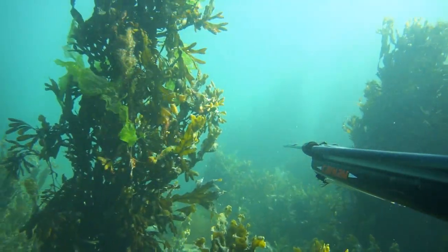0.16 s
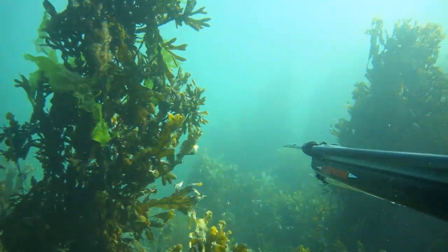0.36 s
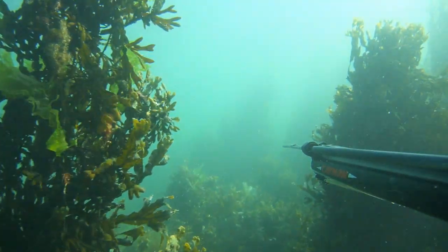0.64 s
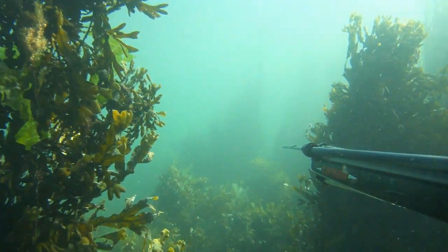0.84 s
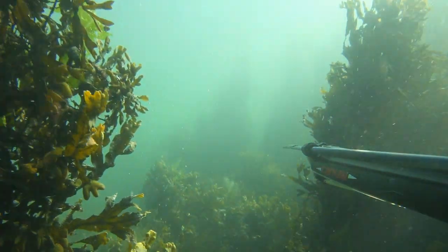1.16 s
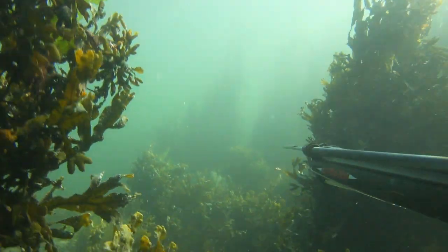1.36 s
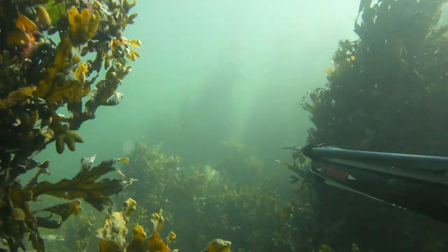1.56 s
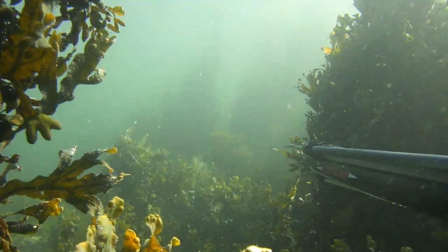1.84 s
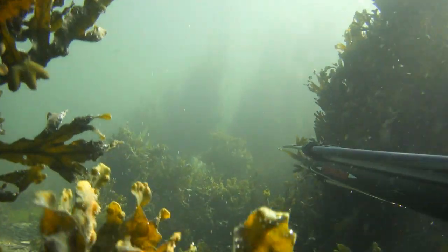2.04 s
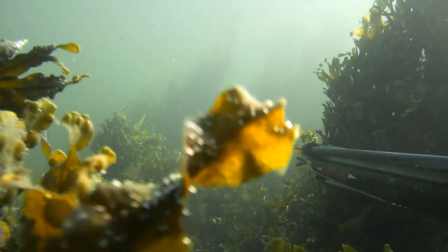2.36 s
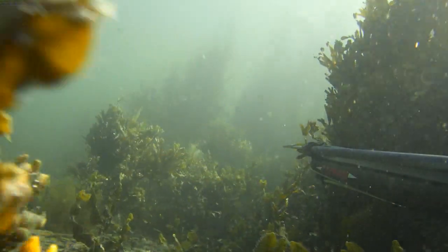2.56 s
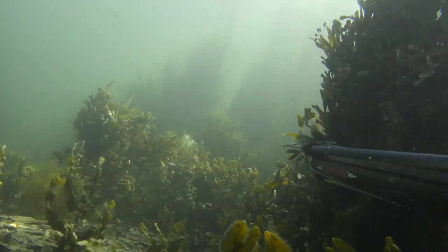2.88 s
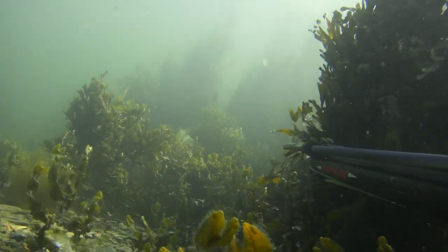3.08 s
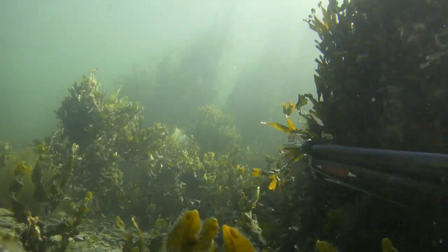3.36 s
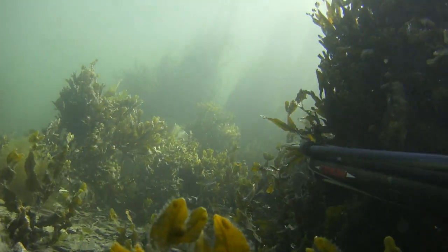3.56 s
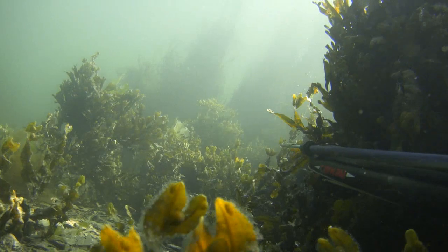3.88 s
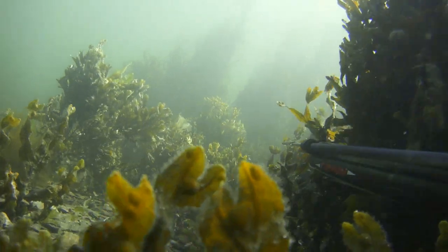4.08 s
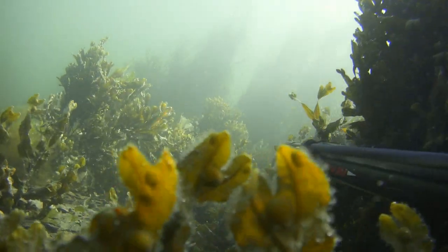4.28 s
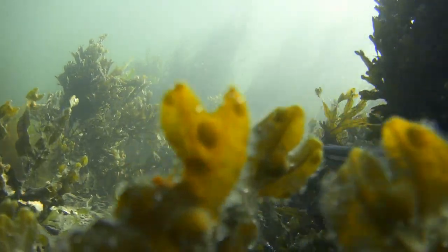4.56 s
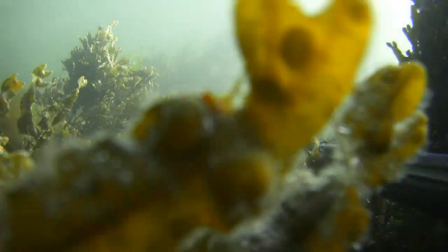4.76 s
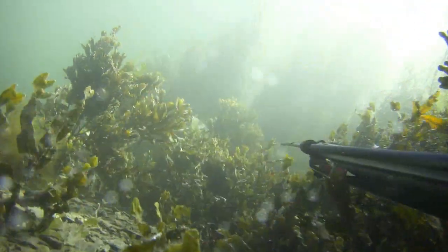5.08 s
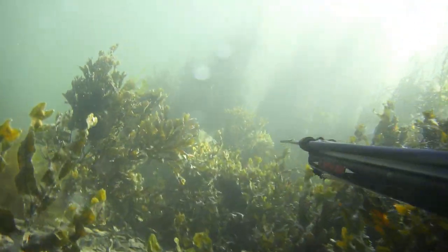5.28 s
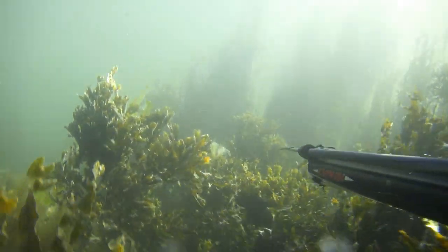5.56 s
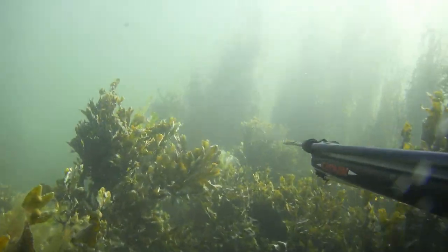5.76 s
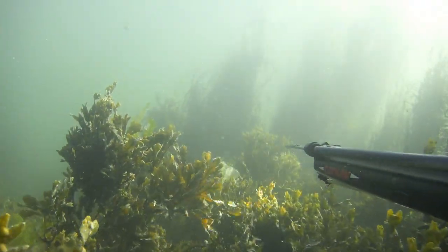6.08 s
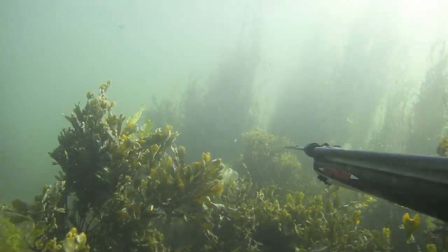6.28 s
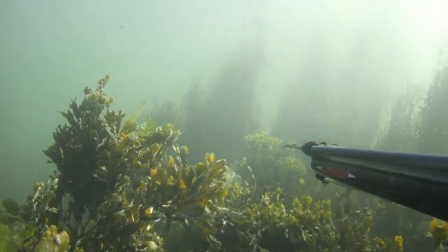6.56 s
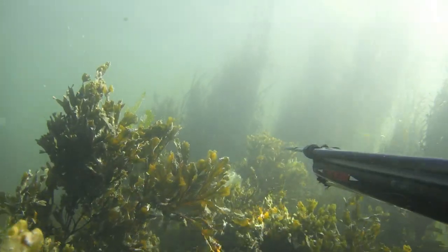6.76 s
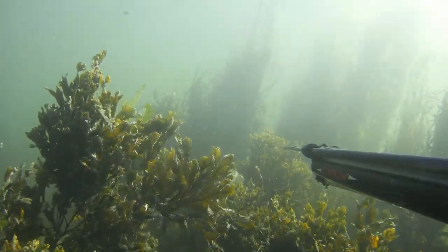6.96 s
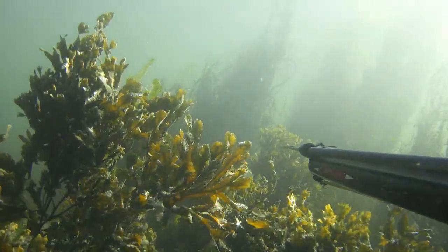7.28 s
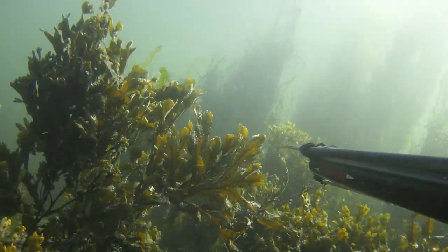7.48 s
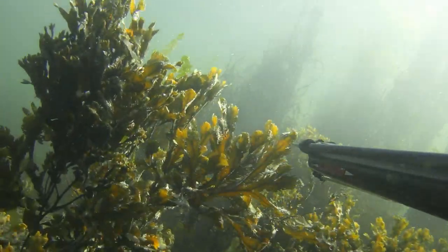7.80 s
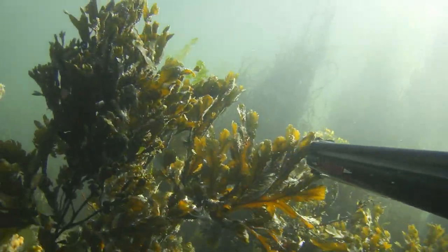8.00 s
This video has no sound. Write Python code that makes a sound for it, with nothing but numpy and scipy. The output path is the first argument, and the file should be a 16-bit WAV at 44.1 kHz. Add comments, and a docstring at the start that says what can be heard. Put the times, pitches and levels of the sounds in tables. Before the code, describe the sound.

Close, boxy mono underwater sound. Water murmurs and rustles against a sealed case, with a thin high whine and a metallic buzzing of quick motor ticks, silent briefly early on. Bright snaps come several times a second in clusters, with gaps. Fronds brush and tap; one hard knock comes near two and a half seconds, then a short flurry of bumps and rough scraping around five, before it settles to buzz and clicks.

```python
"""Water thrums and rustles in a watertight camera housing from the start, over faint hiss and a thin high
whine. A focus motor ticks about 120 times a second and rests once; enclosed air gulps and the iris snaps.
Fronds of seaweed brush the wall, knock on it, and later one scrapes along in short strokes. Flow, brushing and
scraping are shaped noise; knocks and motor steps are damped rings; snaps and ticks are bursts of rattle through
resonances; gulps and whine are tones."""
import sys
import numpy as np
from scipy import signal
from scipy.fft import rfft, irfft, next_fast_len
from scipy.io import wavfile
from scipy.ndimage import uniform_filter1d, map_coordinates

SR = 44100
rng = np.random.default_rng(int(sys.argv[2]) if len(sys.argv) > 2 else 0)


def output_pcm(signal):
    """Save a mono or channel-first signal as 16-bit PCM at the path in sys.argv[1].

    Samples are clipped to [-1, 1] before scaling.
    """
    pcm = np.clip(np.atleast_2d(signal).T, -1, 1) * 32767
    wavfile.write(sys.argv[1], SR, np.round(pcm).astype(np.int16))


N = 358533

# water flowing past the housing: time_s, thrum_db, rumble_db
WATER_FLOW = [(0, -46, -58), (.2, -38.5, -48.5), (.34, -50.5, -56), (.62, -47.5, -49), (.72, -41, -46),
              (.97, -39, -48), (1.2, -46.5, -59), (1.56, -57, -62), (2.22, -48.5, -71), (2.3, -44.5, -48),
              (2.56, -37, -47), (2.87, -40.5, -51.5), (3.3, -38.5, -48.5), (3.7, -40, -59),
              (3.9, -43, -54.5), (4.6, -43, -53), (4.76, -33, -43), (5.35, -43, -45), (5.9, -46.5, -47.5),
              (6.15, -45.5, -57), (7.93, -50, -64), (8.13, -62, -57)]
# resonances of the housing wall: centre_hz, width_hz, relative_db
WALL_MODES = [(1246, 330, 5.5), (1815, 141, 4.5), (2140, 130, -4), (2840, 306, -2), (4400, 860, -1)]
# resonances of the air in the housing: centre_hz, width_hz, relative_db
AIR_MODES = [(320, 250, -0.5), (527, 193, 9.5)]
# resonances of the housing as a whole: centre_hz, width_hz, relative_db
HOUSING_MODES = [(103, 63, 0), (212.4, 134, 27)]
# spectrum of the steady noise: frequency_hz, relative_db (per Hz)
HISS_SPECTRUM = [(20, -12), (270, -12.5), (400, -22.5), (830, -0.5), (1320, -15), (2840, -10.5),
                 (4300, -12.5), (5600, -15.5), (7160, -9.5), (8300, -18), (10800, -23), (11600, -28),
                 (12700, -25), (13500, -74)]
# focus motor, one row per step of its cycle: high_ring_before_turn_db, high_ring_after_turn_db,
# low_ring_db, body_db, tick_before_turn_db, tick_after_turn_db
MOTOR_STEPS = [(-38.5, -36, -40.5, -36.5, -46, -57), (-40, -35.5, -52, -45, -56, -48),
               (-43, -34, -48, -36.5, -47, -44), (-26, -50, -43, -78, -42, -48),
               (-39.5, -37.5, -31.5, -34.5, -44.5, -43.5), (-39, -51, -68, -51, -53, -50),
               (-34, -46, -55, -33.5, -44, -46.5), (-38, -33, -65, -66, -45, -45)]
# rings of the lens barrel (high free, high held, low, body): pitch_hz, t60_s
BARREL_RINGS = [(4770, 0.07), (4700, .009), (3640, 0.011), (1720, 0.018)]
# resonances in the tick of a step: centre_hz, width_hz, level_db
TICK_MODES = [(3830, 480, -6.5), (4390, 460, 1), (5330, 550, 1), (6740, 790, -6.5), (7960, 710, -10.5),
              (9840, 1450, -17)]
# squeezes of the enclosed air: centre_s, level_db, pitch_hz
AIR_GULPS = [(0.142, -28.5, 490), (0.191, -27.5, 517), (0.701, -21.5, 523), (0.853, -23.5, 470),
             (1.035, -25, 463), (1.358, -30.5, 494), (2.319, -28, 533), (2.36, -29, 518), (2.55, -27, 517),
             (2.571, -29, 521), (2.635, -27, 497), (2.667, -27, 500), (3.022, -33, 513), (3.351, -22, 496),
             (3.412, -27, 503), (3.437, -23, 510), (3.464, -28, 492), (3.488, -21, 513), (3.62, -26, 484),
             (3.631, -24.5, 507), (4.687, -25.5, 442), (5.558, -34, 235), (5.776, -36, 219),
             (5.801, -28.5, 490), (5.853, -36.5, 240), (5.979, -36, 250), (7.972, -33.5, 456),
             (8.071, -28.5, 507)]
# iris snaps: time_s, level_db
IRIS_SNAPS = [(0.169, -12), (0.2354, -11), (0.304, -11.5), (0.436, -10), (.603, -11.5), (0.702, -12.5),
              (0.837, -13.5), (1.004, -13), (1.103, -14.5), (1.238, -13.5), (1.279, -28), (1.304, -22),
              (1.404, -13.5), (1.7377, -13.5), (2.206, -13.5), (2.8397, -18.5), (3.005, -15), (3.106, -16),
              (3.164, -21), (3.2407, -21), (3.374, -18), (3.5075, -16.5), (3.6075, -20.5), (3.6737, -17.5),
              (3.7749, -17.5), (3.8417, -15.5), (3.908, -11.5), (3.9751, -17.5), (4.042, -15),
              (4.135, -14.5), (4.14, -13.5), (4.1474, -11), (5.473, -15), (5.478, -10), (5.486, -21),
              (5.509, -13.5), (5.543, -14), (5.575, -12), (5.609, -12), (5.6758, -12.5), (5.776, -10.5),
              (5.9097, -16), (6.0094, -13.5), (6.11, -14.5), (6.177, -14.5), (6.2769, -12), (6.4108, -13),
              (6.578, -16.5), (6.744, -14), (6.945, -14), (7.8126, -16.5), (7.979, -19)]
# resonances of the iris blades: centre_hz, width_hz, relative_db
BLADE_MODES = [(1690, 530, 0.5), (2560, 1400, -4.5), (3630, 430, 1.5), (4540, 480, 4), (6150, 2000, 3),
               (7440, 950, 5), (8920, 550, -0.5), (10810, 590, -5.5), (12000, 550, -19)]
# fronds brushing the wall: start_s, length_s, rustle_db, thrum_db
FROND_BRUSHES = [(.37, 0.039, -44, -48), (.69, 0.028, -33.5, -35), (.82, 0.11, -41, -55),
                 (.91, 0.047, -38.5, -44), (1.31, 0.017, -34, -44), (1.39, 0.083, -42, -48),
                 (1.59, 0.053, -35.5, -45.5), (1.7, 0.032, -37.5, -44.5), (2.475, 0.083, -55, -39.5),
                 (2.66, 0.022, -38.5, -41), (3.0, 0.13, -41.5, -40), (3.3, 0.062, -39, -51),
                 (3.37, 0.06, -47, -35), (3.635, 0.04, -61, -35.5), (3.73, 0.055, -39.5, -58),
                 (4.68, 0.033, -37.5, -44), (4.74, 0.043, -37.5, -51), (5.44, 0.11, -37.5, -41),
                 (5.66, 0.026, -33.5, -50), (6.23, 0.023, -40, -61), (6.295, 0.0086, -33, -53),
                 (6.475, 0.026, -40, -53), (6.535, 0.048, -37.5, -48), (6.785, 0.012, -39, -45),
                 (6.855, 0.026, -39, -48), (7.365, 0.031, -38.5, -54), (7.49, 0.03, -36.5, -51),
                 (7.845, 0.0069, -40, -49), (8.06, 0.043, -40.5, -45)]
# fronds and bubbles knocking on the housing: start_s, blow_db, ring_db, ring_hz
HOUSING_KNOCKS = [(0.6623, -19, -18, 1140), (.701, -27, -13, 1270), (.708, -22, -18, 540),
                  (0.793, -20, -11.5, 1320), (0.9195, -16, -14, 1210), (0.956, -26, -16.5, 1300),
                  (1.492, -25, -18, 1310), (2.4549, -7.5, -17, 1033), (2.4599, -8.5, -15.5, 312),
                  (2.4632, -22, -15, 500), (3.507, -17, -18, 1760), (3.7676, -18, -15.5, 650),
                  (4.678, -16, -16, 1920), (4.7922, -2, -18, 560), (4.7965, -20, -10.5, 610),
                  (4.812, -15, -18, 610), (4.851, -19, -16, 570), (4.926, -18, -24, 510),
                  (4.949, -11, -17, 437), (5.001, -12, -9, 423), (5.0687, -2, -12, 594),
                  (5.104, -26, -12, 700), (5.124, -5, -20, 1900), (5.214, -14, -26, 430),
                  (5.222, -22, -10, 534), (5.236, -20, -11, 493), (5.255, -13, -11, 1900),
                  (5.286, -19, -24, 477), (5.298, -13, -19, 1820), (5.3523, -7, -13, 830),
                  (5.355, -24, -9, 2100), (5.367, -13.5, -5, 2980), (5.3778, -34, 0, 1960),
                  (5.401, -24, -10, 1710), (5.409, -22, -14, 2030), (5.677, -12, -18, 1290),
                  (5.684, -9, -25, 235), (8.089, -31, -24, 1280)]
# a frond dragged over the port: start_s, length_s, scrape_db, thrum_db, rumble_db
FROND_STROKES = [(4.84, 0.091, -30.5, -32, -40.5), (4.97, 0.018, -30.5, -28.5, -35),
                 (5.02, 0.057, -24.5, -25.5, -35.5), (5.1, 0.04, -25, -29, -42),
                 (5.155, .02, -31, -32.5, -37), (5.22, 0.074, -26.5, -25, -36.5),
                 (5.352, 0.013, -31, -56, -53)]
# spectrum of the scraping frond: frequency_hz, relative_db (per Hz)
FROND_SPECTRUM = [(50, -35), (110, -7), (350, -27), (600, -3), (1000, -4.5), (1320, -3), (1600, -5.5),
                  (1900, -2.5), (2400, -9.5), (3540, -15), (5350, -16), (10000, -32), (13000, -45)]

# rustle_db at the calm thrum level; dB of rustle per dB of thrum; dB of chance swell per unit of wobble
RUSTLE_DB, CALM_THRUM_DB, RUSTLE_SHARE, SWAY_DB = -40.5, -40.5, 0.1, 1.72
HISS_DB = -46
STEP_PERIOD_S, FIRST_STEP_S, RING_CUTOFF_S = .008344, .0022, .0115
REST_START_S, REST_END_S, TURN_S = 1.31, 2.065, 3.05
RESTART_DB, RESTART_FADE_S = 9.5, .03
GULP_RISE_CYCLES, GULP_FALL_CYCLES = 1.85, 2.2
SNAP_S, CREST_DB = 0.004, 7  # length of the rattle; allowance for its peak over its rms
BRUSH_RISE_S, BRUSH_FALL_S = 0.0078, 0.013
RING_CYCLES = 16.2  # cycles until a knock's ring has lost 60 dB
STROKE_RISE_S, STROKE_FALL_S = 0.019, 0.038
BAND_LIMIT_HZ = 14255


def amp(db):
    """Definition of level: amplitude ratio from decibels."""
    return 10 ** (np.asarray(db) / 20)


def unit(x):
    """Normalisation to an rms of 1."""
    return x / np.sqrt(np.mean(x ** 2) + 1e-20)


def curves(rows):
    """Linear interpolation: one value per sample for each column after the time."""
    s, *cols = np.transpose(rows)
    return [np.interp(np.arange(N) / SR, s, c) for c in cols]


def wobble(rate):
    """Band-limited chance: a smooth random curve with rate knots a second."""
    knots = rng.standard_normal(int(N * rate / SR) + 4)
    return map_coordinates(knots, [np.arange(N) * rate / SR])


def filtered(x, response):
    """Linear filtering: the spectrum of x times a complex response of frequency."""
    m = next_fast_len(N + SR // 2)
    return irfft(rfft(x, m) * response(np.fft.rfftfreq(m, 1 / SR)), m)[..., :N]


def modes(table):
    """Modal superposition: damped resonances added with alternating sign."""
    def response(f):
        total = 0
        for k, (centre, width, db) in enumerate(table):
            resonance = 1j * f * width / (centre * centre - f * f + 1j * f * width)
            total = total + (-1) ** k * amp(db) * resonance
        return total
    return response


def steep_modes(table):
    """Cascaded resonance: the modes times one broad mode at their mean frequency, for steeper skirts."""
    centre = np.mean(table, 0)[0]
    broad = modes([(centre, 1.5 * centre, 0)])
    return lambda f: modes(table)(f) * broad(f)


def colour(points):
    """Spectral envelope: straight lines in dB between points on a log frequency axis."""
    f, db = np.transpose(points)
    return lambda hz: amp(np.interp(np.log(hz + 1), np.log(f + 1), db))


def eddies(response, lumpy_db, rate, grit=0, kicks_per_s=150):
    """Turbulent excitation: unit-rms filtered noise of fluctuating size; grit adds sparse single kicks."""
    kicks = grit * rng.uniform(-1.1, 1, N) * (rng.random(N) < kicks_per_s / SR)
    size = amp(lumpy_db * np.clip(wobble(rate), -3, 1.3))
    return unit(filtered((rng.standard_normal(N) + kicks) * size, response))


def swells(rows, rise_s, fall_s):
    """Energy addition: one gain per dB column; each row has a Gaussian rise, a hold and an exponential fall."""
    t = np.arange(N) / SR

    def shape(s, length):
        before, after = np.minimum(t - s, 0), np.maximum(t - s - length, 0)
        return np.exp(-(before / rise_s) ** 2 - after / fall_s)
    return np.sqrt(sum(np.outer(amp(db), shape(s, length)) ** 2 for s, length, *db in rows))


def evened(x, size):
    """Level equalisation: x divided by its running rms over size samples."""
    return x / np.sqrt(np.abs(uniform_filter1d(x ** 2, size=size)) + 1e-12)


def thrum():
    """Cavity resonance: eddies, brushes and strokes excite the enclosed air."""
    flow_db, _ = curves(WATER_FLOW)
    _, brush = swells(FROND_BRUSHES, BRUSH_RISE_S, BRUSH_FALL_S)
    _, stroke, _ = swells(FROND_STROKES, STROKE_RISE_S, STROKE_FALL_S)
    gain = np.hypot(amp(flow_db), np.hypot(brush, stroke))
    response = lambda f: steep_modes(AIR_MODES)(f) / (1 + (f / 680) ** 6)
    return gain * eddies(response, lumpy_db=2.0, rate=76, grit=8.6, kicks_per_s=120)


def rumble():
    """Whole-body resonance: eddies and strokes excite the housing as one."""
    _, flow_db = curves(WATER_FLOW)
    _, _, stroke = swells(FROND_STROKES, STROKE_RISE_S, STROKE_FALL_S)
    return np.hypot(amp(flow_db), stroke) * eddies(steep_modes(HOUSING_MODES), lumpy_db=3.5, rate=18)


def rustle():
    """Plate resonance under turbulence: gritty eddies excite the wall, a little more when the flow thrums."""
    thrum_db, _ = curves(WATER_FLOW)
    gain = amp(RUSTLE_DB + RUSTLE_SHARE * (thrum_db - CALM_THRUM_DB) + SWAY_DB * wobble(9))
    response = lambda f: steep_modes(WALL_MODES)(f) / (1 + (f / 5200) ** 8)
    return gain * eddies(response, lumpy_db=4, rate=140, grit=17.0, kicks_per_s=250)


def hiss():
    """Broadband noise: far water and the microphone, with a slow drift in level."""
    drift_db = .6 * wobble(3)
    return amp(HISS_DB + drift_db) * eddies(colour(HISS_SPECTRUM), lumpy_db=1, rate=60)


def whine():
    """Frequency and amplitude modulation: a thin, slightly unsteady high tone."""
    gain = amp(-65 + 3.7 * wobble(20))
    pitch_hz = 7850 + 4 * wobble(20)
    return gain * np.sin(2 * np.pi * np.cumsum(pitch_hz) / SR)


def focus():
    """Periodic impulsive excitation: motor steps ring the barrel and tick; the cycle changes as the drive turns."""
    s = np.arange(FIRST_STEP_S, N / SR, STEP_PERIOD_S)
    t = np.arange(SR // 10) / SR
    number = np.arange(len(s))
    db = np.array(MOTOR_STEPS)[number % len(MOTOR_STEPS)]
    db = db + 1.3 * rng.standard_normal(db.shape)
    # steps close to the end of the rest hit harder
    db += RESTART_DB * np.exp(-np.abs(s - REST_END_S) / RESTART_FADE_S)[:, None]
    play_s = .000025 * rng.standard_normal(len(s))  # slack in the gears scatters each step in time
    at = ((s + play_s) * SR).astype(int)
    running = (s < REST_START_S) | (s > REST_END_S)

    def train(level_db):
        return np.bincount(at, amp(level_db) * running, N)[:N]

    early_ring, late_ring, low, body, early_tick, late_tick = db.T
    high = np.where(s < TURN_S, early_ring, late_ring)
    free = number % 4 == 0  # every fourth step rings on until the next one has landed
    levels = [np.where(free, high, -120), np.where(free, -120, high), low, body]
    rings = np.zeros(N)
    for level, (hz, t60) in zip(levels, BARREL_RINGS):
        ring = (t < RING_CUTOFF_S) * amp(-60 * t / t60) * np.sin(2 * np.pi * hz * t)
        rings += signal.fftconvolve(train(level), ring)[:N]

    tick = np.exp(-((t - .0008) / .0014) ** 2)
    whirr = amp(-15 - 60 * t / 0.16)  # the gears run on between the steps
    tick_db = np.where(s < TURN_S, early_tick, late_tick)
    gate = signal.fftconvolve(train(tick_db), tick + whirr)[:N]
    rattle = filtered(rng.standard_normal(N), modes(TICK_MODES))
    return rings + gate * evened(rattle, 100)  # even over about 2.3 ms, so chance adds little to a tick's level


def gulps():
    """Enclosed-air oscillation: squeezed air sings for a few cycles, a soft swell of one tone without a blow."""
    out, t = np.zeros(N), np.arange(N) / SR
    for s, db, hz in AIR_GULPS:
        near = slice(round((s - .05) * SR), round((s + .08) * SR))
        cycle = (t[near] - s) * hz
        spread = np.where(cycle < 0, GULP_RISE_CYCLES, GULP_FALL_CYCLES)
        out[near] += amp(db) * np.exp(-(cycle / spread) ** 2) * np.sin(2 * np.pi * cycle)
    return out


def iris():
    """Modal response to impacts: a few milliseconds of quick uneven impacts ring the blades."""
    gate, t = np.zeros(N + SR), np.arange(SR // 20) / SR
    rise = np.minimum(t / .0007, 1)
    # slow fall during the rattle, then a sudden drop and a faster fall
    fall_db = -9 * t / SNAP_S - 600 * np.maximum(t - SNAP_S, 0) - 7 * (t > SNAP_S)
    for s, db in IRIS_SNAPS:
        gate[round((s - .0004) * SR):][:len(t)] += amp(db - CREST_DB) * rise * amp(fall_db)
    impacts = rng.standard_normal(N) * amp(3 * wobble(1500))
    impacts = evened(impacts, 70)  # even over about 1.6 ms, so chance adds little to a snap's level
    blades = modes(BLADE_MODES)
    return filtered(gate[:N] * impacts, blades) / np.std(filtered(impacts, blades))


def brushes():
    """Plate resonance under friction: brushing fronds excite the wall, with less treble than the rustle."""
    gain, _ = swells(FROND_BRUSHES, BRUSH_RISE_S, BRUSH_FALL_S)
    response = lambda f: steep_modes(WALL_MODES)(f) / (1 + (f / 3000) ** 4)
    return gain * eddies(response, lumpy_db=2.5, rate=120, grit=11.3, kicks_per_s=270)


def knocks():
    """Impact and free vibration: a sharp, short blow on the wall together with one damped ring."""
    out, t = np.zeros(N + SR), np.arange(SR // 8) / SR
    for s, blow_db, ring_db, hz in HOUSING_KNOCKS:
        ring_decay = amp(ring_db - 60 * t * hz / RING_CYCLES)
        ring = ring_decay * (1 - np.exp(-t / 0.0012)) * np.sin(2 * np.pi * hz * t)
        blow_decay = amp(blow_db - 60 * t / 0.0048)
        blow = -blow_decay * (1 - np.exp(-t / 0.0003)) * np.sin(2 * np.pi * 1350 * t)
        out[round(s * SR):][:len(t)] += ring + blow
    return out[:N]


def scrape():
    """Stick-slip friction: rough, kicked noise of a wet frond, heard only around its strokes."""
    gain, _, _ = swells(FROND_STROKES, STROKE_RISE_S, STROKE_FALL_S)
    return gain * eddies(colour(FROND_SPECTRUM), lumpy_db=3.0, rate=120, grit=10.3, kicks_per_s=300)


def scene():
    """Superposition: the sounds of all sources add into one channel."""
    water = thrum() + rumble() + rustle()
    background = hiss() + whine()
    mechanism = focus() + iris()
    fronds = brushes() + knocks() + scrape()
    return (water + background + mechanism + gulps() + fronds)[None]


def record(dry):
    """Band limitation: the microphone loses deep bass and top treble; the camera keeps nothing above its limit."""
    def response(hz):
        bass_loss = (1j * hz / (45 + 1j * hz)) ** 2
        treble_loss = 1 / (1 + (hz / 13300) ** 40)
        return (hz < BAND_LIMIT_HZ) * bass_loss * treble_loss
    return filtered(dry, response)


dry = scene()
out = record(dry)
output_pcm(out)
```